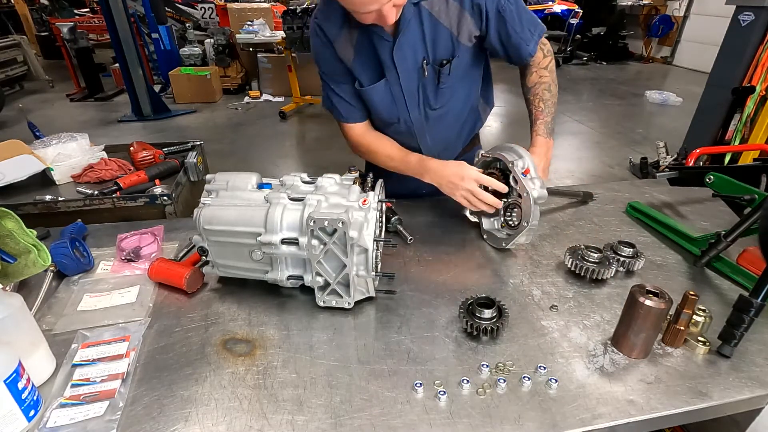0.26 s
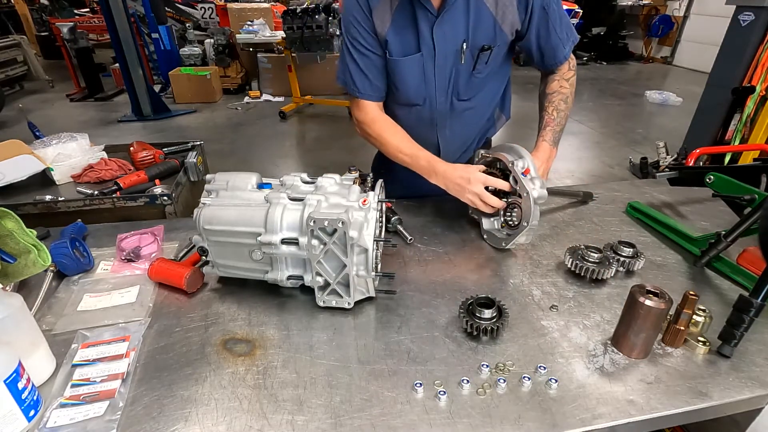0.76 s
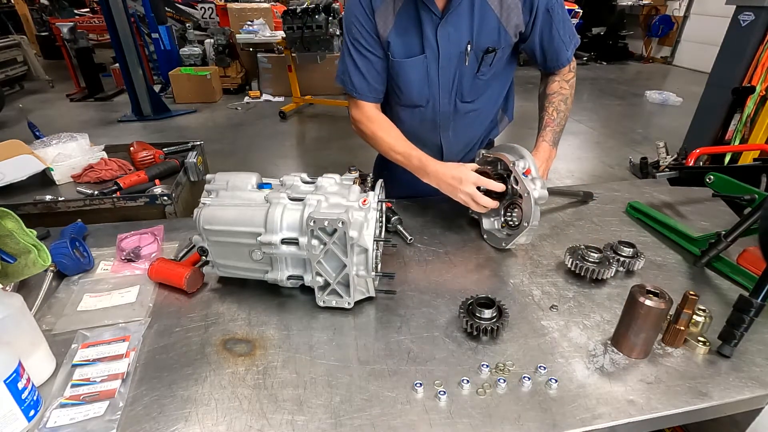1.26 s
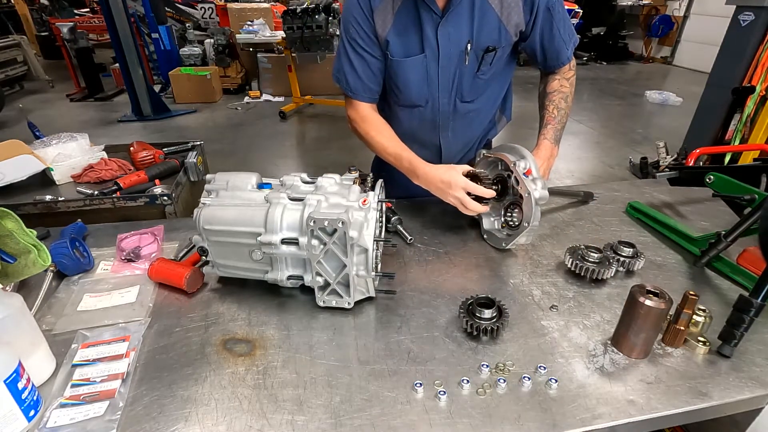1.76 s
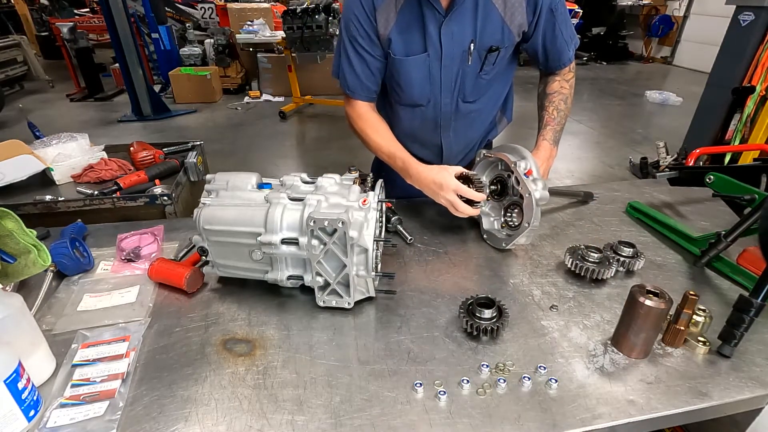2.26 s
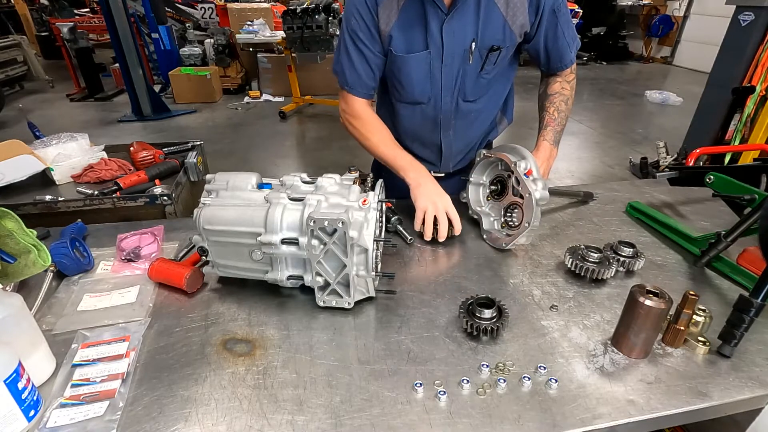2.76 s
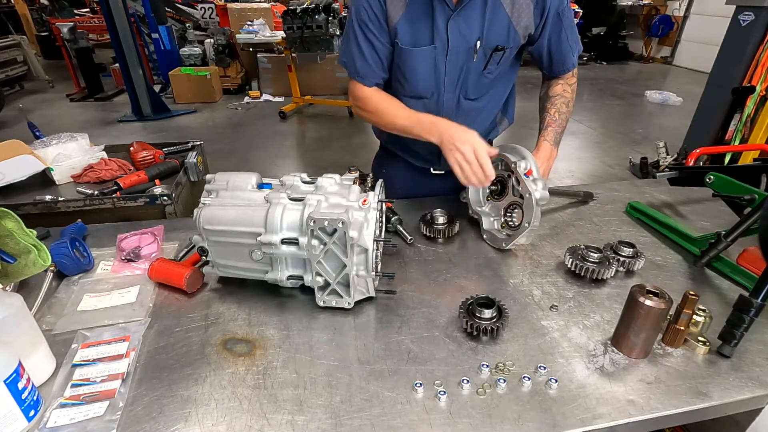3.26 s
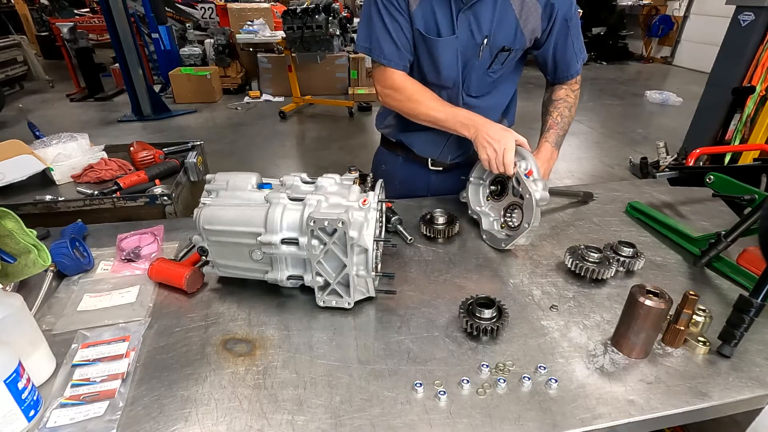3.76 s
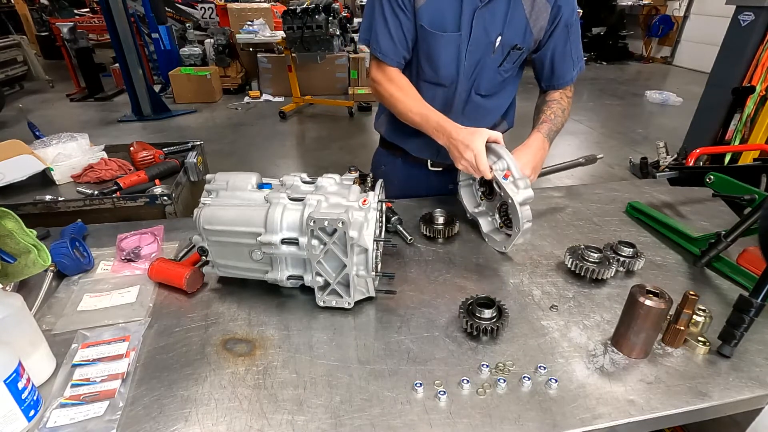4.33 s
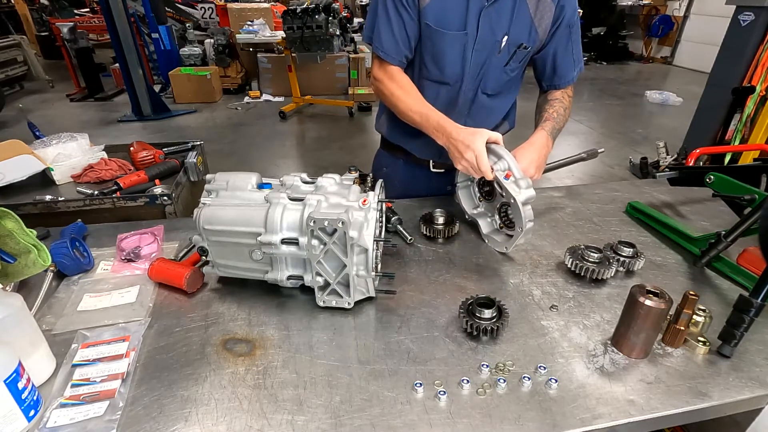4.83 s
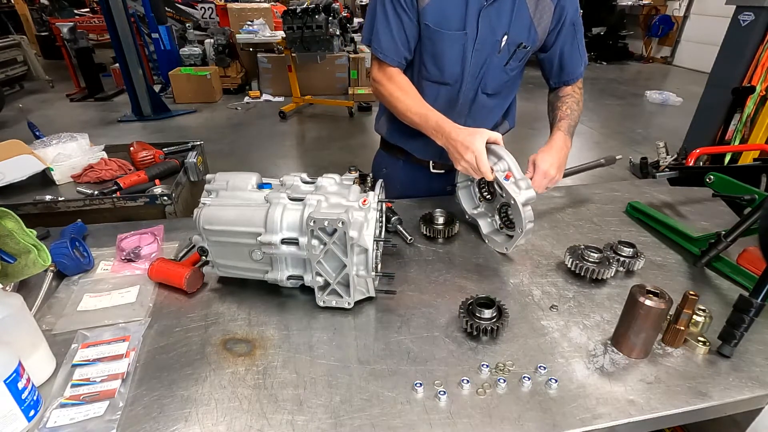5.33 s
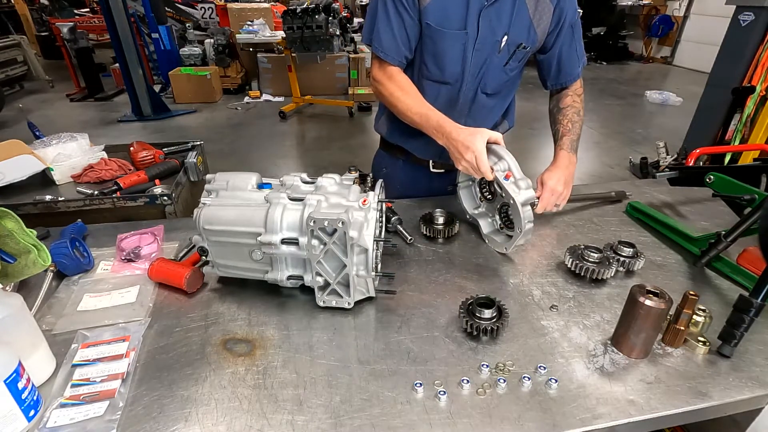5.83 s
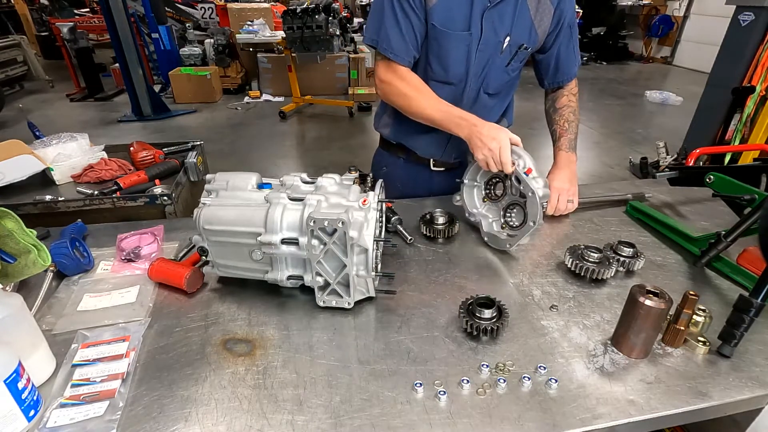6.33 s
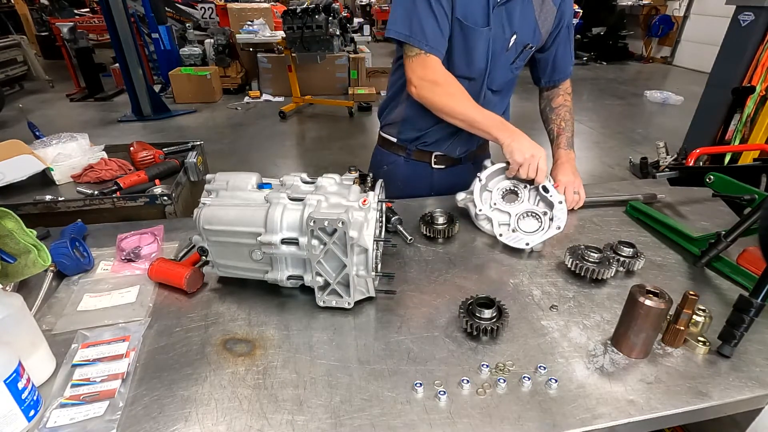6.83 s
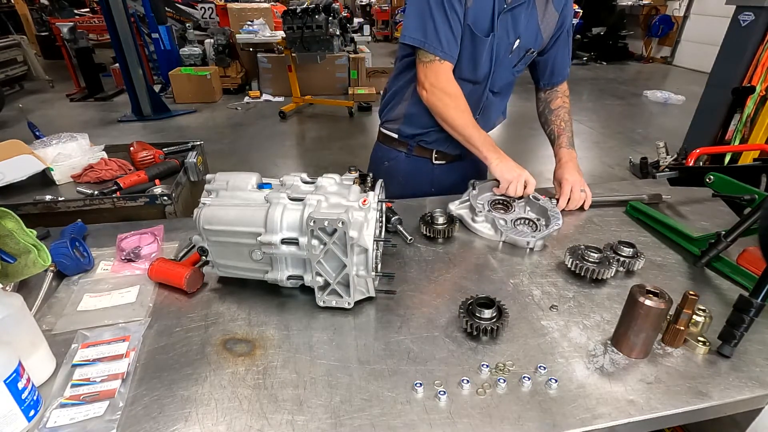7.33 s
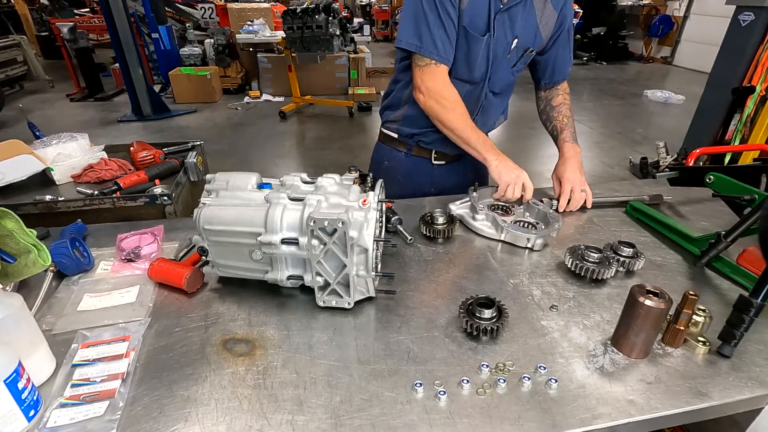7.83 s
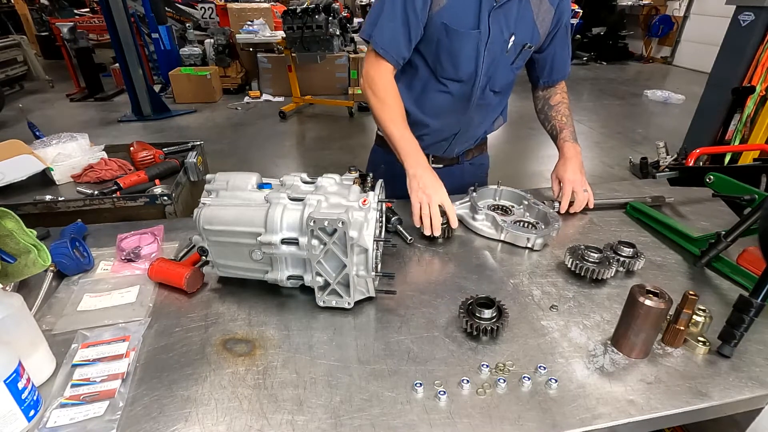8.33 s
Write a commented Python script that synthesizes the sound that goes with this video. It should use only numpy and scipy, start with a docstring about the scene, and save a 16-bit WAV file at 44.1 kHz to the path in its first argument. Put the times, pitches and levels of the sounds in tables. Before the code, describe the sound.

Faint metallic rubbing, a loud gear drop on a steel workbench, then a heavy cover dragged and laid flat with booming knocks and chatter over low rumble.

```python
"""Gearbox taken apart on a bench

In a garage, a gear is slid off its shaft with faint rubs and puffs and dropped on a steel workbench.
The cast end cover is tipped, dragged on its rim and laid flat, where it chatters and a loose steel ring sings.
Blows set decaying tones and bands of noise ringing; rubs and puffs are streams of tiny random ticks.
Blows also set the bench top booming and leave a faint garage tail, over steady rumble, air and hiss."""
import sys
import numpy as np
from scipy import signal
from scipy.fft import rfft, irfft, next_fast_len
from scipy.io import wavfile
from scipy.ndimage import uniform_filter1d

SR = 44100
rng = np.random.default_rng(int(sys.argv[2]) if len(sys.argv) > 2 else 0)


def dump_mix(stems):
    """Bounce the given channels to the path in sys.argv[1] as a 16-bit WAV at rate SR."""
    frames = np.atleast_2d(stems).T  # one column per channel
    limited = np.clip(frames, -1, 1)  # hard clip at full scale
    pcm = np.round(limited * 32767).astype(np.int16)
    wavfile.write(sys.argv[1], SR, pcm)


N = 378819
TIME = np.arange(N) / SR

# building rumble, as a relative spectrum: [f/Hz, level per Hz/dB]
RUMBLE_COLOUR = [(6, 12.5), (16, -3), (28, -6), (45, -14), (62, -13), (90, -22.5), (160, -39.5),
                 (400, -71.5), (1500, -110)]
# garage air, as a relative spectrum: [f/Hz, level per Hz/dB]
AIR_COLOUR = [(41, -29), (70, -4.5), (185, -3), (207, -13.5), (243, 1), (272, -17.5), (364, -6),
              (390, -21.5), (446, -12.5), (560, -15.5), (613, -15.5), (962, -19.5), (3330, -20.5),
              (15500, -32)]

# A blow is a clang, plus a thud that grows with the weight behind it and a click that grows with
# the hardness of the contact. The spot where it lands picks the pitch of the bench boom.
# centres of thud, knock, clang and click: [f/Hz]
REGISTERS_HZ = (180, 550, 2800, 8000)
# cover and its shaft on the bench; weight and hardness are relative to the clang:
# [t/s, clang/dB, weight/dB, hardness/dB, spot f/Hz, boom level/dB]
COVER_BLOWS = [(0.002, -68.5, 20.5, -3, 318, -40.5), (4.057, -51.5, 16, -16, 171, -48),
               (4.379, -45.5, 13.5, -13, 193, -42.5), (4.898, -68, 25.5, -2, 235, -51.5),
               (5.932, -30.5, 2, -5, 133, -37), (6.55, -33, 6, -5, 169, -31.5),
               (6.836, -31, 6, -7, 600, -22.5), (6.892, -33.5, -2.5, -11.5, 584, -25),
               (6.956, -35, 1.5, -8, 322, -51), (7.556, -43.5, 10, -25, 1340, -31),
               (7.578, -37, 3.5, -9, 172, -43), (7.613, -45.5, 9.5, -5.5, 320, -44),
               (7.793, -41, 17, 0, 240, -44), (7.801, -30, 0.5, -11.5, 130, -33),
               (7.829, -29.5, 3.5, -0.5, 147, -21), (7.841, -34.5, -1, -9.5, 320, -26.5)]
# gear on the bench: [t/s, clang/dB, weight/dB, hardness/dB, spot f/Hz, boom level/dB]
GEAR_BLOWS = [(2.801, -22.5, -3.5, -4.5, 139, -17), (3.046, -50.5, -10, -12, 1100, -48),
              (3.078, -33, 3, -8.5, 210, -30), (8.521, -58, 13.5, -8.5, 200, -52),
              (8.529, -50.5, 13, -20, 507, -32.5)]
# strong modes (natural tones) of each part together with the bench top:
# [f/Hz, relative level/dB, time to fall 60 dB/s]
COVER_MODES = [(98.9, -9.5, 0.71), (154.7, -3, 0.63), (180.1, -10, 0.33), (211, -10.5, 1), (244, -10, 0.49),
               (266.2, -10.5, 0.32), (283.8, -3, 0.42), (320, -6.5, 0.64), (401, -15, 0.61),
               (489, -11.5, 0.33), (510, -10, 0.58), (606, -19.5, 0.77), (670, -13.5, 0.72),
               (743, -15, 0.23), (795, -11, 0.51), (1010, -19, 0.094), (1256, -8.5, 0.21),
               (1600, -41, 0.22), (1860, -42, 0.18), (1960, -27, 0.14), (2252, -9, 0.16),
               (2555, -7.5, 0.13), (3262, -22, 0.2), (3820, -21, 0.18)]
GEAR_MODES = [(100, -7, 0.69), (115, -15.5, 0.99), (151.5, -12, 0.59), (193, -7, 0.7), (200, 0.5, 0.29),
              (252, -19.5, 0.92), (321, -8.5, 0.25), (355, -5, 0.25), (407, -10, 0.36), (507.4, -6.5, 0.11),
              (600, -7, 0.29), (801, -12, 0.28), (1055, -7, 0.21), (1180, -12, 0.18), (1507, -25, 0.39),
              (1895, -16.5, 0.4), (2030, -15.5, 0.25), (2480, -15, 0.28), (2912, -21, 0.22),
              (3136, -21, 0.3), (3262, -14, 0.3), (3460, -20.5, 0.3), (3686, -21, 0.3), (3820, -20, 0.59),
              (4640, -14, 0.37), (5900, -29.5, 0.27), (6472, -17, 0.3)]
# crowd of weaker modes in each part: [f/Hz, level per third octave/dB]
COVER_CROWD = [(45, -12.5), (80, -23.5), (140, -13.5), (280, -12.5), (560, -11), (1100, -11.5), (2000, -9),
               (2600, -14.5), (3500, -6), (6500, -13), (10000, -11.5), (15000, -18)]
GEAR_CROWD = [(45, -20.5), (80, -26), (140, -4), (280, -10.5), (560, -8.5), (1100, -15.5), (2000, -7.5),
              (2600, -12), (3500, -3.5), (6500, -8.5), (10000, -6), (15000, -9.5)]
# how fast the crowd dies: [f/Hz, time to fall 60 dB/s]
CROWD_T60 = [(60, 0.28), (200, 0.25), (600, 0.32), (3500, 0.31), (8000, 0.22), (15000, 0.084)]
# first echoes from the bench top, the gearbox and the floor: [delay t/s, relative level/dB]
ECHOES = [(.0021, -30), (.0067, -19), (0.0105, -15)]
# bench top modes: [f/Hz, relative level/dB, time to fall 60 dB/s]
BENCH_MODES = [(123, -0.5, .19), (138.4, -6.5, 0.21), (176.7, 2, 0.31), (202.3, 0, 0.63), (236, -6.5, .75),
               (321, 1, .21), (490, -16.5, 0.28), (520, -5, 0.2), (600, 1.5, 0.025), (1116, 2.5, 0.039),
               (1266, 3, .03)]
# bench frame modes: [f/Hz, level against the thud/dB, time to fall 60 dB/s]
FRAME_MODES = [(32.7, -12, 1.0), (58.2, -14, .5)]

# brief narrow squeaks and a faint whistle: [t/s, f/Hz, level/dB, half length t/s]
SQUEAKS = [(0.684, 4770, -61.5, 0.0031), (4.832, 3710, -71.5, 0.043)]
# Pushes: each rises like the first half of a bell curve, then dies away.
# faint rubs and puffs while the gear is worked loose and slid off:
# [peak t/s, relative level/dB, swell t/s, treble tilt/dB]
SLIDES = [(.95, -66, 0.046, 0), (1.13, -60, 0.064, 1), (1.3, -65, 0.031, -8.5), (1.53, -76, .02, 8),
          (1.92, -68, .025, 3), (2.03, -67, 0.083, 5), (2.29, -64, 0.077, 2.5)]
# cover rim dragged over the bench: [peak t/s, relative level/dB, swell t/s, treble tilt/dB]
DRAGS = [(3.98, -55, 0.061, 5), (6.165, -48.5, 0.066, 3.5), (6.26, -46.5, 0.053, 3),
         (6.35, -49.5, 0.069, 4.5), (6.475, -43.5, 0.049, 4.5)]
# cover shivering on the bench after it lands: [peak t/s, level/dB, swell t/s, treble tilt/dB]
SHIVERS = [(7.08, -42.5, 0.12, 2), (7.28, -62, .06, 2), (8.12, -49, 0.038, -2), (8.27, -52, 0.12, 0),
           (8.55, -49, 0.098, -2.5)]
# colours of these sounds, as relative spectra: [f/Hz, level per Hz/dB]
SLIDE_COLOUR = [(150, -21), (250, -16), (306, -1.5), (516, -2.5), (680, -10), (1080, -9), (1370, -16),
                (1900, -12.5), (2690, -23), (3760, -11), (5100, -24), (14000, -34)]
DRAG_COLOUR = [(76, -46), (130, -2.5), (215, -5.5), (315, 2.5), (410, -12.5), (511, 1), (796, -7.5),
               (1030, -4), (1430, -11.5), (3910, -11.5), (8740, -28.5), (14500, -29), (16000, -38)]
SHIVER_COLOUR = [(100, -20), (150, 11.5), (300, -1.5), (600, -7.5), (1300, -17), (2500, -27.5), (4000, -16),
                 (7000, -28.5), (15000, -33)]
# loose ring, each touch replacing the ringing before it: [t/s, level/dB, time to fall 60 dB/s]
RING_TOUCHES = [(6.866, -38.5, 0.36), (6.985, -55, 0.32), (7.07, -59, 0.76), (7.603, -40, 0.89),
                (7.94, -48, 1.74)]
# loose ring's modes: [f/Hz, relative level/dB]
RING_MODES = [(4831, 0), (8280, -34)]

RUMBLE_DB, AIR_DB, HISS_DB = -49.5, -68, -83  # hiss: each channel, before the top is cut
CUTOFF_HZ = 15650  # the microphone's top end
SIDE_SLOPE = 0.024  # a tiny difference between the channels, growing towards the treble
KNOCK_SHARE = 0.48  # share of the weight (in dB) that reaches the knock register
CRACK_HZ = 7000  # the crack of a contact is at half power here, and fuller above
RADIATES_ABOVE_HZ = 90  # a struck plate radiates little below this pitch
# the cover lands edge first: delay of the full weight, clang lost by then, weight held back at first
SETTLE_S, SETTLE_LOSS_DB, HELD_BACK_DB = .008, 8, 9.5
# laid flat, it rocks in light, uneven taps: (from, to), time between taps, spread of that time
ROCKING_SPAN_S, ROCK_EVERY_S, ROCK_JITTER_S = (8.066, 8.48), .051, 0.0098
# one such tap: clang, weight, hardness, spread of strength
ROCK_DB, ROCK_WEIGHT_DB, ROCK_HARDNESS_DB, ROCK_SPREAD_DB = -56, 10, -28, 0.5
SPOT_OCTAVES = 0.18  # a bench mode this far from the spot's pitch is woken 3 dB less
LET_DOWN_S = 6.4  # from here on the cover's whole weight rests on the bench
SINGS_ABOVE_HZ = 1000  # slips make only a part's modes above this pitch sing


def from_db(db):
    """Turn decibels into gain."""
    return 10 ** (np.asarray(db) / 20)


def rms_one(x):
    """Scale to an average strength (rms) of 1."""
    return x / np.sqrt(np.mean(x ** 2) + 1e-20)


def at_hz(points, hz):
    """Read a table between its points, with pitch spaced as the ear hears it (log frequency)."""
    pitch, value = np.transpose(points)
    return np.interp(np.log(np.maximum(hz, 1)), np.log(pitch), value)


def coloured(x, colour):
    """Shape a sound's spectrum, falling away below the colour's lowest point; rms 1."""
    size = next_fast_len(N, True)
    hz = np.arange(size // 2 + 1) * SR / size
    skirt = np.minimum(hz / colour[0][0], 1) ** 4
    spectrum = rfft(x, size) * from_db(at_hz(colour, hz)) * skirt
    return rms_one(irfft(spectrum, size)[:N])


def drift(per_s):
    """Smooth random wandering with spread 1, mostly around per_s swings a second."""
    colour = [(per_s / 4, 0), (per_s, 0), (per_s * 8, -80), (per_s * 16, -200)]
    return rms_one(coloured(rng.standard_normal(N), colour))


def building_rumble():
    """Low noise from the building, its level drifting slowly."""
    level = from_db(RUMBLE_DB + 1.2 * drift(1.5))
    return level * coloured(rng.standard_normal(N), RUMBLE_COLOUR)


def garage_air():
    """Steady, faint noise with the garage's colour."""
    return from_db(AIR_DB) * coloured(rng.standard_normal(N), AIR_COLOUR)


def band(x, hz):
    """Keep a third of an octave; white noise of rms 1 comes out at about rms 1."""
    low, high = hz * 2 ** (-1 / 6), hz * 2 ** (1 / 6)
    sos = signal.butter(2, [low, high], "band", fs=SR, output="sos")
    return signal.sosfilt(sos, x + 1e-18) * np.sqrt(SR / 2 / (high - low))


def ring(clicks, hz, t60):
    """Each click of size 1 starts a sine of height 1 that falls 60 dB in t60 seconds."""
    shrink = from_db(-60 / (t60 * SR))  # per sample
    turn = 2 * np.pi * hz / SR  # radians per sample
    feedback = [1, -2 * shrink * np.cos(turn), shrink * shrink]
    return signal.lfilter([0, np.sin(turn)], feedback, clicks + 1e-18)


def dying(energy, t60):
    """Stored energy leaks away, 60 dB in t60 seconds."""
    return signal.lfilter([1], [1, -10 ** (-6 / (t60 * SR))], energy + 1e-24)


def strikes(blows, hz, scatter_db):
    """One click per blow, about as strong as that blow is at this pitch, with some chance."""
    clicks = np.zeros(N)
    for (s, clang, weight, hardness, *_), luck in zip(blows, rng.standard_normal(len(blows))):
        registers_db = (weight, KNOCK_SHARE * weight, 0, hardness)
        tilt = at_hz(list(zip(REGISTERS_HZ, registers_db)), hz)
        clicks[max(round(s * SR), 0)] += from_db(clang + tilt + scatter_db * luck)
    return clicks


def echoed(x):
    """Hard surfaces close by thicken each attack and comb its spectrum."""
    copies = sum(from_db(db) * np.interp(TIME - delay, TIME, x, left=0) for delay, db in ECHOES)
    power = 1 + sum(from_db(db) ** 2 for _, db in ECHOES)
    return (x + copies) / np.sqrt(power)


def struck(blows, modes, crowd, modes_db, crack_db, crack_t60, room_db, room_t60):
    """Heavy metal on the bench: a crack, strong modes, a dense crowd of weak ones, the garage's tail."""
    notes, wash = np.zeros((2, N))
    for hz, db, t60 in modes:
        # each mode is struck a little stronger or weaker by chance
        notes += from_db(db + modes_db) * ring(strikes(blows, hz, scatter_db=1.0), hz, t60)
    for hz in 50 * 2 ** (np.arange(26) / 3):  # one band per third octave
        energy = strikes(blows, hz, scatter_db=1.48) ** 2
        body = dying(energy, at_hz(CROWD_T60, hz))
        # the crack lives in the treble
        crack_share = hz ** 2 / (hz ** 2 + CRACK_HZ ** 2)
        crack = from_db(crack_db) ** 2 * crack_share * dying(energy, crack_t60)
        # the room swallows treble soonest
        room = from_db(room_db) ** 2 * dying(energy, room_t60 / (1 + hz / 18000))
        noise = rng.standard_normal(N) * np.sqrt(body + crack + room)
        wash += from_db(at_hz(crowd, hz)) * band(noise, hz)
    high_pass = signal.butter(2, RADIATES_ABOVE_HZ, "high", fs=SR, output="sos")
    return signal.sosfilt(high_pass, notes) + echoed(wash)


def settling(blows):
    """Each blow is two contacts: the edge with a bright clang, then the full weight with a dull one."""
    edges = [(s, clang, weight - HELD_BACK_DB, hardness)
             for s, clang, weight, hardness, *_ in blows]
    bodies = [(s + SETTLE_S, clang - SETTLE_LOSS_DB, weight + SETTLE_LOSS_DB, hardness)
              for s, clang, weight, hardness, *_ in blows]
    return edges + bodies


def rocking():
    """Light taps of the cover rocking on its rim, uneven in time and strength."""
    beats = np.arange(*ROCKING_SPAN_S, ROCK_EVERY_S)
    chances = rng.standard_normal((len(beats), 2))
    return [(s + ROCK_JITTER_S * late, ROCK_DB + ROCK_SPREAD_DB * luck, ROCK_WEIGHT_DB, ROCK_HARDNESS_DB)
            for s, (late, luck) in zip(beats, chances)]


def cover_blows():
    """The cast cover lands edge first, then with its weight, and at last rocks on its rim."""
    return struck(settling(COVER_BLOWS) + rocking(), COVER_MODES, COVER_CROWD, modes_db=-6.0,
                  crack_db=0.5, crack_t60=0.061, room_db=-16.5, room_t60=1.0)


def boom(hits, hz, t60):
    """One bench mode struck by (s, dB) hits; a plate radiates little below its resonance."""
    clicks = np.zeros(N)
    for s, db in hits:
        clicks[max(round(s * SR), 0)] += from_db(db)
    high_pass = signal.butter(2, .7 * hz, "high", fs=SR, output="sos")
    return signal.sosfilt(high_pass, ring(clicks, hz, t60))


def bench():
    """The top booms in the modes nearest to each blow's spot; the frame sways under the cover's weight."""
    out = np.zeros(N)
    for hz, db, t60 in BENCH_MODES:
        hits = [(s, boom_db + db - 3 * (np.log2(hz / spot_hz) / SPOT_OCTAVES) ** 2)
                for s, *_, spot_hz, boom_db in GEAR_BLOWS + COVER_BLOWS]
        out += boom(hits, hz, t60)
    for hz, db, t60 in FRAME_MODES:
        thuds = [(s, clang + weight + db) for s, clang, weight, *_ in COVER_BLOWS if s > LET_DOWN_S]
        out += boom(thuds, hz, t60)
    return out


def squeaks(ring_share):
    """Noise swells briefly in one narrow resonance; the longer the swell, the purer its note."""
    out = np.zeros(N)
    for s, hz, db, length in SQUEAKS:
        swell = np.exp(-.5 * ((TIME - s) / length) ** 2)
        note = rms_one(ring(rng.standard_normal(N), hz, ring_share * length))
        out += from_db(db) * swell * note
    return out


def pushed(pushes, release_t60):
    """Gain over time: each push swells to its peak, then dies away; their powers add."""
    power = 0
    for s, db, swell_s, _ in pushes:
        swell = np.exp(-.5 * (np.minimum(TIME - s, 0) / swell_s) ** 2)
        release = from_db(-60 * np.maximum(TIME - s, 0) / release_t60)
        power = power + (from_db(db) * swell * release) ** 2
    return np.sqrt(power)


def brightened(x, pushes, pivot_hz):
    """Tilt the sound towards treble or bass around a pivot, gliding from one push's tilt to the next."""
    s, _, _, treble_db = np.transpose(pushes)
    treble = signal.sosfilt(signal.butter(1, pivot_hz, "high", fs=SR, output="sos"), x)
    tilt = from_db(np.interp(TIME, s, treble_db))
    return treble * tilt + (x - treble) / tilt


def rubbed(pushes, colour, part_modes, sing_db, slips_per_s, spread_db, t60, direct_db, judder_db,
           release_t60, pivot_hz):
    """Tiny slips of uneven size, each heard as a tick and as the ringing of the metal."""
    sizes = from_db(spread_db * np.minimum(rng.exponential(1, N), 4)) * rng.choice([-1, 1], N)
    happens = rng.random(N) < slips_per_s / SR
    slips = sizes * happens * from_db(judder_db * drift(49))
    age = TIME[:SR // 2]
    metal = rng.standard_normal((2, len(age))) * from_db(-60 * age / t60)
    # as the contact travels, it hands over between two sets of modes
    place = drift(5.7)
    shares = (np.cos(place), np.sin(place))
    ringing = sum(signal.fftconvolve(slips * share, modes)[:N] for share, modes in zip(shares, metal))
    singing = sum(ring(slips, hz, decay) for hz, _, decay in part_modes if hz > SINGS_ABOVE_HZ)
    sound = rms_one(ringing) + from_db(sing_db) * rms_one(singing) + from_db(direct_db) * rms_one(slips)
    return pushed(pushes, release_t60) * brightened(coloured(sound, colour), pushes, pivot_hz)


def gear_slide():
    """Faint rubs and puffs while the gear is slid off, all made from a dense stream of small ticks."""
    slide = rubbed(SLIDES, SLIDE_COLOUR, GEAR_MODES, sing_db=-13, slips_per_s=2000, spread_db=1.0,
                   t60=0.125, direct_db=-12, judder_db=1.5, release_t60=0.54, pivot_hz=1200)
    return from_db(0.5) * slide


def gear_blows():
    """The dropped gear hits the bench and both ring."""
    return struck(GEAR_BLOWS, GEAR_MODES, GEAR_CROWD, modes_db=-1.0,
                  crack_db=-3.0, crack_t60=.04, room_db=-22, room_t60=0.91)


def cover_drag():
    """The cover's rim scrapes over the bench in fewer, more uneven slips."""
    drag = rubbed(DRAGS, DRAG_COLOUR, COVER_MODES, sing_db=-13, slips_per_s=800, spread_db=2.5,
                  t60=0.19, direct_db=-5.5, judder_db=1.3, release_t60=0.49, pivot_hz=2790)
    return from_db(1.9) * drag


def loose_ring():
    """A thin steel ring sings on one almost pure note until it is touched again."""
    height = np.zeros(N)
    for s, db, t60 in RING_TOUCHES:
        fading = from_db(db - 60 * np.maximum(TIME - s, 0) / t60)
        height = np.where(TIME >= s, fading, height)
    note = sum(from_db(db) * np.sin(2 * np.pi * hz * TIME) for hz, db in RING_MODES)
    # smoothing over about 2 ms softens each touch
    return np.sqrt(2) * uniform_filter1d(height, size=90) * note


def cover_shiver():
    """The landed cover trembles against the bench in sparse slips."""
    return rubbed(SHIVERS, SHIVER_COLOUR, COVER_MODES, sing_db=-9, slips_per_s=120, spread_db=2.0,
                  t60=0.16, direct_db=-6.5, judder_db=-2.5, release_t60=0.58, pivot_hz=2800)


def scene():
    """Add up parts, bench and garage air at the microphone, the same in both channels."""
    background = building_rumble() + garage_air()
    blows = cover_blows() + bench() + gear_blows()
    friction = squeaks(ring_share=1.2) + gear_slide() + cover_drag() + cover_shiver()
    return np.tile(background + blows + friction + loose_ring(), (2, 1))


def record(dry):
    """Two almost equal channels, each with its own faint hiss; the top is cut steeply."""
    # the signal's slope is added to one channel and taken from the other
    side = SIDE_SLOPE / 2 * np.gradient(dry, axis=1) * [[1], [-1]]
    hiss = from_db(HISS_DB) * rng.standard_normal((2, N))
    low_pass = signal.ellip(10, .2, 80, CUTOFF_HZ, fs=SR, output="sos")
    return signal.sosfilt(low_pass, dry + side + hiss)


dry = scene()
out = record(dry)
dump_mix(out)
```